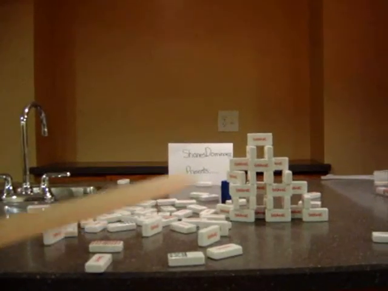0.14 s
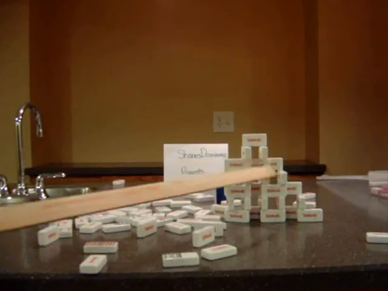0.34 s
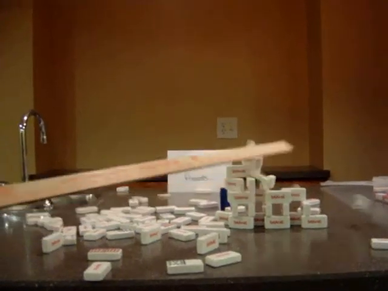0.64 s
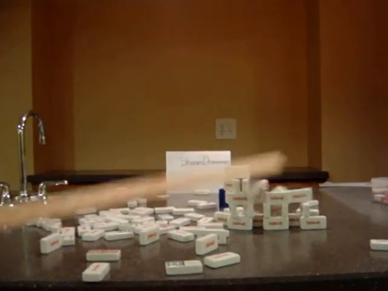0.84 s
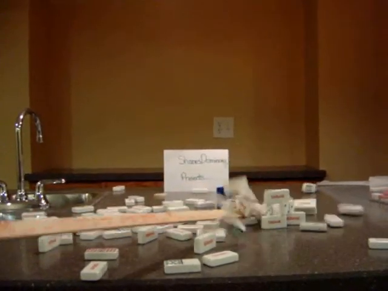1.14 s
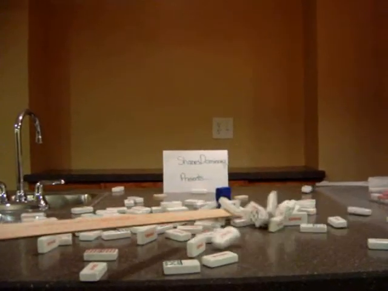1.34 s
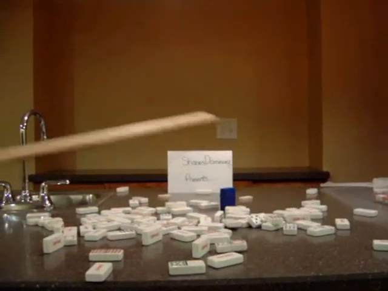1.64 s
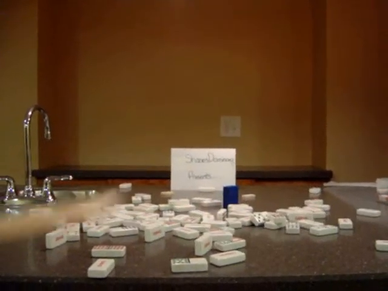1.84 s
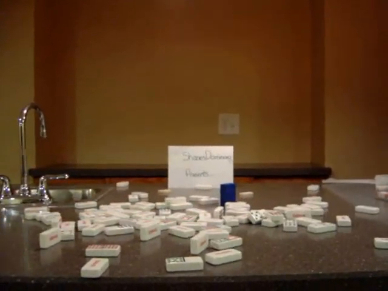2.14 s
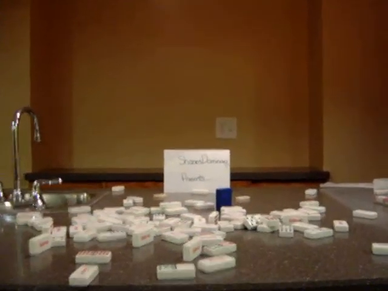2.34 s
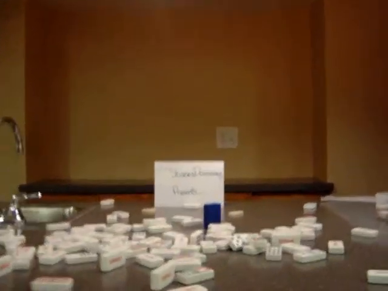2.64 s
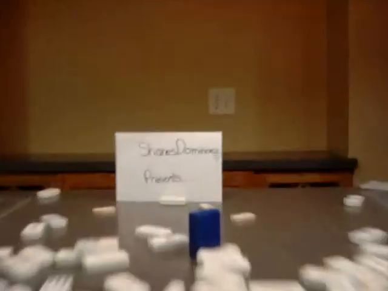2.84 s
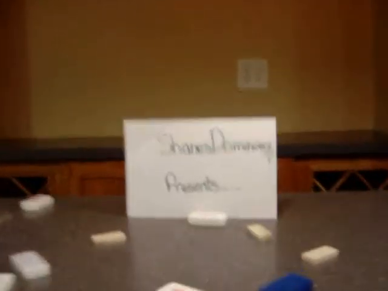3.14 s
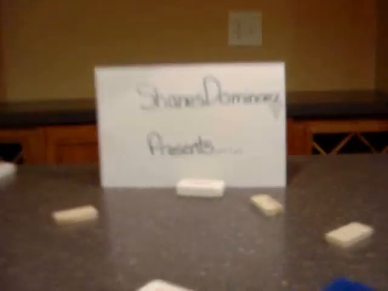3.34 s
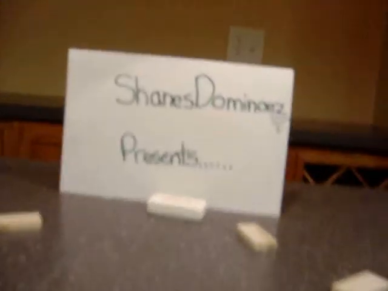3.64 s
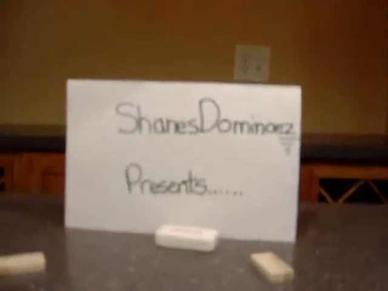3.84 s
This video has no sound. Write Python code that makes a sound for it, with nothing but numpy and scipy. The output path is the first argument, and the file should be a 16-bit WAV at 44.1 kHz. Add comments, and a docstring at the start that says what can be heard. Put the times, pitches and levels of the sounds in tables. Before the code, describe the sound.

Hard domino tiles clack sharply from the start in separate bursts, then from about 0.7 s tumble densely onto a kitchen counter, loud and slightly distorted, thinning out by 2 s with a short room echo. Faint hiss, low murmur and wavering appliance hum remain. A handling tick comes near 2.55 s, a quick double wooden stick knock at 2.8 s, then ticks and soft rubs around 3, 3.5 and 3.8 s.

```python
"""A kitchen counter, where a stick topples towers of small hard tiles: they clack together and land dully.
Clacks are short noise bursts with ringing tile modes; landings are duller bursts with a boom of the counter.
Loud single hits lie over a dense random tumble. Hiss, a murmur and a wavering appliance hum stay on.
Then come ticks and rubs from handling the camera, made of noise through resonances,
and two knocks of the stick being laid down, with its wood modes ringing."""
import sys
import numpy as np
from scipy import signal
from scipy.fft import rfft, irfft
from scipy.io import wavfile
from scipy.ndimage import uniform_filter1d

SR = 44100
rng = np.random.default_rng(int(sys.argv[2]) if len(sys.argv) > 2 else 0)


def store_wav(level_fs):
    """Save 16-bit WAV to argv[1]."""
    pcm = np.round(np.clip(np.atleast_2d(level_fs), -1, 1) * 32767)
    wavfile.write(sys.argv[1], SR, pcm.T.astype(np.int16))


N = 176400


def amp(db):
    """Turn decibels into a plain gain."""
    return 10 ** (np.asarray(db) / 20)


def evened(x):
    """Scale a sound to an RMS level of one."""
    return x / np.sqrt(np.mean(x ** 2) + 1e-20)


def read(points, hz):
    """Read a table of values against pitch, along a logarithmic pitch scale."""
    f, value = np.transpose(points)
    return np.interp(np.log(hz + 1), np.log(f + 1), value)


def curve(table, col):
    """Draw one column of a table as straight lines over the whole scene."""
    table = np.asarray(table)
    return np.interp(np.arange(N) / SR, table[:, 0], table[:, col])


def add(mix, start_s, sound):
    """Lay a sound into the mix from its start time, cut off at the end."""
    part = mix[round(start_s * SR):][:len(sound)]
    part += sound[:len(part)]


def colour(x, tone):
    """Filter with the given spectrum, responding as early as possible (minimum phase)."""
    hz = abs(np.fft.fftfreq(8192, 1 / SR))
    log_gain = np.log(amp(np.maximum(read(tone, hz), -100)))
    taps = np.fft.ifft(np.exp(np.conj(signal.hilbert(log_gain)))).real[:4096]
    return signal.oaconvolve(x, taps)[:len(x)]


def band(x, hz, width):
    """One resonance that lets a band of the given width through."""
    return signal.lfilter(*signal.iirpeak(hz, max(hz / width, .3), SR), x)


SNAP = 2.6  # size of the first click against the noise after it
CHATTER_S, CHATTER_DB = .014, -2  # longest delay of the quick bounces, and their greatest level


def contact(t60, tone, bounce_s=0.):
    """One impact: a snap and a dying puff of noise, perhaps with quick bounces; evenly broad, then coloured."""
    t = np.arange(4410) / SR
    first = t == 0
    puff = rng.standard_normal(len(t)) * amp(-60 * t / t60) + SNAP * first
    bounces = .7 * first
    if bounce_s > 0:
        when, size = rng.random((2, 9))
        at = 1 + (bounce_s * when * SR).astype(int)
        bounces[at] = amp(CHATTER_DB) * np.cos(2 * np.pi * size)
    spectrum = rfft(puff) * rfft(bounces)
    # level the spectrum so that only the tone table colours it
    smooth_power = uniform_filter1d(abs(spectrum) ** 2, size=12)
    flat = irfft(spectrum / np.sqrt(smooth_power + 1e-9))
    flat = flat * amp(-12 * t / (t60 + bounce_s))
    x = colour(flat, tone)
    return 3 * x / np.linalg.norm(x)


# The colour of two tiles touching. Each row: pitch in Hz, level in dB.
CLACK_TONE = [(880, -21.5), (1500, -7), (2360, -27), (3950, -4.5), (5260, -4), (7800, -4.5), (9790, -10.5),
              (10800, -21), (11800, -11.5), (15900, -16)]
# The ways a tile rings. Each row: pitch in Hz, level in dB, time to fade by 60 dB in seconds.
TILE = [(7669, -4, 0.028), (12530, -25.5, 0.016), (6200, -12, .015), (8200, -11.5, 0.023),
        (15320, -20, 0.012)]
CLACK_S = 0.0033  # fade of the noise puff by 60 dB, seconds
TILE_SPREAD = .025  # random detuning, as a share of the pitch


def clack(ring_db, bounce_s=0.):
    """A sharp contact that rings the tile's modes, slightly detuned for each tile."""
    t = np.arange(4410) / SR
    x = contact(CLACK_S, CLACK_TONE, bounce_s)
    for hz, db, t60 in TILE:
        detune, loudness = rng.standard_normal(2)
        ring = amp(ring_db + db + 2 * loudness - 60 * t / t60)
        x = x + ring * np.sin(2 * np.pi * hz * (1 + TILE_SPREAD * detune) * t)
    return x


# The boom of the counter. Each row: pitch in Hz, level in dB.
BOOM_TONE = [(88, -36.5), (150, -18), (253, -1), (292, -2.5), (334, 3.5), (467, -6), (678, -8.5),
             (1000, -7), (1300, -32), (2200, -120)]
BOOM_S = 0.017  # fade of the noise puff by 60 dB, seconds


def boom():
    """A low noise burst: the counter top answering a hit."""
    return contact(BOOM_S, BOOM_TONE)


# The lowest part of the tumble. Each row: pitch in Hz, level in dB.
RUMBLE_TONE = [(15, -3.5), (30, 0), (150, 0.5), (300, -19.5), (1000, -49)]


def rumble():
    """A very low noise burst under the tumble."""
    return contact(0.038, RUMBLE_TONE)


# The colour of a tile landing on the counter. Each row: pitch in Hz, level in dB.
LAND_TONE = [(290, -35), (500, -17), (700, -11), (1100, -7.5), (1500, -4.5), (2000, 0.5), (2600, -0.5),
             (3500, -3), (6900, -12.5), (9000, -13.5), (11700, -46), (19800, -100)]
LAND_S = 0.019  # fade of the noise puff by 60 dB, seconds
DULL_HZ = 5000  # the single landings lose treble above this


def landing(boom_db, tilt_db):
    """A dulled bouncing contact, tilted in colour around 2000 Hz, with the boom of the counter."""
    tone = [(hz, level + tilt_db * np.log2(hz / 2000)) for hz, level in LAND_TONE]
    b, a = signal.butter(N=2, Wn=DULL_HZ, fs=SR)
    tap = signal.lfilter(b, a, contact(LAND_S, tone, CHATTER_S))
    return tap + amp(boom_db + 8) * boom()


SIZE_DB = 2  # how unevenly loud the random hits are


def scatter(make, per_s, level_db, count):
    """Random impacts of uneven size that follow a level; they stop where the tumble ends."""
    size = amp(SIZE_DB * np.minimum(rng.exponential(1, N), 4))
    size = size * (rng.random(N) < per_s / SR) * rng.choice([-1, 1], N)
    which = rng.integers(0, count, N)
    shapes = [make() for _ in range(count)]
    shape_energy = np.mean([np.sum(s ** 2) for s in shapes])
    scale = np.sqrt(np.mean(size ** 2) * shape_energy)
    falling = np.arange(N) < TUMBLE[-1][0] * SR
    size = size * amp(level_db) * falling / scale
    return sum(signal.oaconvolve(size * (which == k), s)[:N] for k, s in enumerate(shapes))


# The rest of the tumble, before each layer's trim.
# Each row: time in seconds, then the levels in dB of the landings, clacks, boom and rumble.
TUMBLE = [(0.0, -20.5, -13, -36, -50.5), (0.042, -23.5, -19.5, -40, -38.5), (0.244, -39.5, -28, -64, -64),
          (0.26, -18.5, -33.5, -36, -55), (0.29, -21, -22.5, -42.5, -47), (0.366, -37.5, -34.5, -49.5, -57),
          (0.382, -23, -29, -39.5, -36.5), (0.464, -38, -34, -56, -45), (0.474, -22, -34, -46.5, -48),
          (0.538, -23.5, -27, -48, -47), (0.562, -30, -29, -46.5, -39.5), (0.656, -22, -23.5, -43.5, -59),
          (0.672, -27, -24, -35, -51), (0.682, -7.5, -21, -27, -60), (0.742, -15.5, -21.5, -27, -52.5),
          (0.798, -19, -23, -34.5, -46), (0.828, -24.5, -22.5, -31.5, -61.5), (0.84, -8, -26, -29, -54),
          (0.872, -4, -20.5, -23, -51), (0.906, -13.5, -14, -37.5, -55.5), (0.922, -7, -17, -28.5, -50.5),
          (0.97, -14, -15, -27, -46), (1.08, -10.5, -16, -25.5, -53), (1.236, -10, -14.5, -28.5, -52.5),
          (1.244, -10, -11.5, -30.5, -34), (1.44, -10, -10, -25.5, -47), (1.468, -9.5, -15.5, -34, -47),
          (1.5, -14, -17, -29, -38), (1.54, -14, -12.5, -28, -50), (1.598, -13.5, -14, -31.5, -57),
          (1.664, -17.5, -17, -30.5, -42), (1.686, -16, -14, -31.5, -64.5), (1.776, -23.5, -29, -34, -45),
          (1.8, -25, -21, -32, -52), (1.84, -25, -25.5, -41, -51.5), (1.938, -29, -24.5, -43, -69),
          (2.0, -48, -53, -51, -75)]
CLACKS_PER_S, LANDINGS_PER_S = 500, 500


def tumble():
    """Four crowds of random impacts that merge into one dense clatter."""
    out = scatter(lambda: clack(-10.5), CLACKS_PER_S, curve(TUMBLE, 2) - 6, count=40)
    out = out + scatter(lambda: contact(LAND_S, LAND_TONE), LANDINGS_PER_S, curve(TUMBLE, 1) - 6, count=40)
    out = out + scatter(boom, 150, curve(TUMBLE, 3) - 5, count=20)
    return out + scatter(rumble, 110, curve(TUMBLE, 4) - 3, count=12)


# Tiles striking each other.
# Each row: start in seconds, level in dB, ring of the tile in dB against the clack.
CLACKS = [(0.0044, 3.5, -6.5), (0.0104, -5.5, -8), (0.016, -17.5, -5), (0.0254, -3, -6.5), (0.038, -4, -8),
          (0.0659, 1, -7), (0.0695, 5.5, -8.5), (0.0759, 0, -8), (0.0917, -1, -2.5), (0.0986, -3, -2),
          (0.2818, -5.5, -9), (0.2836, -0.5, -10.5), (0.3014, -9, -8.5), (0.3784, -4.5, -7),
          (0.3884, 1.5, -5.5), (0.3956, -5.5, -7.5), (0.4231, -0.5, -5.5), (0.433, -8, -6.5),
          (0.4934, -2.5, -4), (0.5086, -13.5, -6.5), (0.566, 2.5, -5.5), (0.5701, -8, -8.5),
          (0.587, -9, -8.5), (0.7795, -9, -14), (0.8, -2.5, -9), (0.923, -3, -7), (0.968, 3.5, -9.5),
          (0.9886, -2.5, -6), (1.1536, -2.5, -7.5), (1.222, 5.5, -9.5), (1.2814, -0.5, -11.5),
          (1.3996, -3, -14), (1.4911, 6.5, -4), (1.528, -2.5, -6), (1.5793, -0.5, -7), (1.6352, 1, -5),
          (1.6986, -3.5, -13.5), (1.7359, 0.5, -6.5), (1.751, -10, -10.5), (1.7902, 0, -9),
          (1.8555, -5, -4), (1.939, -13.5, -6.5)]
# Tiles landing on the counter. Each row: start in seconds, level in dB,
# boom of the counter in dB (raised later by a fixed step), tilt of the colour in dB per octave.
LANDINGS = [(0.0345, 7, -33.5, -0.5), (0.0481, -5, -31, -0.5), (0.0644, -19.5, -24, -3),
            (0.2567, -1, -32.5, -6), (0.2706, -9.5, -37.5, -3), (0.2862, -7, -30.5, -2.5),
            (0.3137, -14, -29, 6.5), (0.3765, 0, -33.5, 0), (0.3841, -2, -41, -1.5),
            (0.4757, -2.5, -28.5, -7.5), (0.5096, -0.5, -42, -1), (0.598, -11.5, -17, -1.5),
            (0.626, -5, -31, -3), (0.6795, 3, -22, -3.5), (0.6939, 0, -21, -5), (0.7195, 1.5, -17.5, -5),
            (0.7364, -11.5, -28.5, -4.5), (0.8355, -3.5, -14.5, -1), (0.915, -1, -28, 3.5),
            (0.9256, 3.5, -35, -1), (0.9695, 4, -31, -2), (0.989, -4.5, -26.5, 3), (1.0445, 0, -21, -5.5),
            (1.1091, -0.5, -22, -6), (1.1547, 1.5, -29, -1), (1.2294, -6, -21, -6.5),
            (1.3995, -4.5, -22.5, -4.5), (1.4795, -9, -23, -5), (1.5699, -7.5, -25, -8),
            (1.6394, -2, -22, 4.5), (1.6995, 0.5, -25, 2), (1.7897, -10, -28, -2)]


def tiles():
    """The loudest impacts, one by one, over the dense tumble."""
    out = tumble()
    for start_s, db, ring_db in CLACKS:
        add(out, start_s, amp(db) * clack(ring_db, CHATTER_S))
    for start_s, db, boom_db, tilt_db in LANDINGS:
        add(out, start_s, amp(db) * landing(boom_db, tilt_db))
    return out


# How long the room rings. Each row: pitch in Hz, time to fade by 60 dB in seconds.
ROOM = [(200, 0.52), (700, 0.43), (2000, 0.52), (5000, 0.49), (9000, 0.42), (15000, 0.35)]


def room(x):
    """Sparse echoes of random sign, each band dying at its own speed; three tails take turns."""
    out = np.zeros(N)
    turn = np.arange(N) / SR * 40
    for k in range(3):
        taps = np.zeros(SR)
        at = np.arange(200, SR - 20, 20)
        taps[at + rng.integers(0, 20, len(at))] = rng.choice([-1., 1.], len(at))
        hz, t, z = signal.stft(taps, SR, nperseg=256)
        fade = amp(-60 * t / read(ROOM, hz)[:, None])
        tail = signal.istft(z * fade, SR, nperseg=256)[1]
        share = np.cos(turn + k * np.pi / 3)
        out += signal.fftconvolve(x * share, tail / np.linalg.norm(tail))[:N]
    return out * np.sqrt(2 / 3)  # the squared shares add up to 3/2


# The colour of the hiss. Each row: pitch in Hz, level in dB.
AIR = [(410, -43.5), (700, -3.5), (1200, -3), (1800, -2), (3800, -9.5), (9400, -13), (10500, -24),
       (15900, -22)]
# Loudness of the hiss, before a small lift. Each row: time in seconds, level in dB.
AIR_LEVEL = [(2.2, -59.5), (2.826, -59), (2.956, -55), (3.166, -58), (3.502, -56.5), (3.678, -54.5),
             (4.0, -55)]


def hiss():
    """Steady coloured noise that slowly changes in level."""
    return evened(colour(rng.standard_normal(N), AIR)) * amp(curve(AIR_LEVEL, 1) + 2.0)


# The colour of the low murmur. Each row: pitch in Hz, level in dB.
MURMUR = [(15, -32), (25, 3.5), (76, -16.5), (134, -9), (181, -10.5), (637, -3), (900, -20.5), (1170, -47),
          (1980, -120)]
# Loudness of the murmur, before a small lift. Each row: time in seconds, level in dB.
LOW_AIR = [(2.2, -64), (2.696, -65.5), (2.9, -61), (3.828, -54.5), (4.0, -56.5)]


def murmur():
    """Low coloured noise that slowly changes in level."""
    return evened(colour(rng.standard_normal(N), MURMUR)) * amp(curve(LOW_AIR, 1) + 1)


# Loudness of the hum, around which it wavers.
# Each row: time in seconds, then the RMS levels in dB of partials 1, 4 and 5.
HUM = [(2.0, -76, -66.5, -70), (2.5, -81, -65.5, -64.5), (2.9, -74, -61.5, -62), (3.2, -66, -76, -53),
       (3.45, -65.5, -62, -63.5), (3.7, -68, -58, -68), (3.8, -62.5, -56, -64), (4.0, -65, -53, -62)]
HUM_HZ = 127


def hum():
    """The appliance: three partials of one low pitch, each wavering at random in level."""
    t = np.arange(N) / SR
    out = np.zeros(N)
    for col, partial in ((1, 1), (2, 4), (3, 5)):
        waver_db = 2.1 * evened(uniform_filter1d(rng.standard_normal(N), 1500))
        level = np.sqrt(2) * amp(curve(HUM, col) + waver_db)
        out += level * np.sin(2 * np.pi * partial * HUM_HZ * t)
    return out


# Ticks in the camera's shell. Each row: start in seconds, peak in dB, pitch in Hz,
# fade of the noise puff by 60 dB in seconds, overtone in dB.
TICKS = [(2.557, -21, 1630, 0.026, -18), (2.577, -38, 1990, 0.015, -19), (2.981, -24.5, 2290, 0.019, -18),
         (2.986, -18.5, 2020, 0.024, -17), (3.006, -40, 2200, 0.013, -16), (3.5, -31.5, 1930, .015, -10),
         (3.530, -31, 1990, 0.014, 1), (3.5345, -21.5, 1370, 0.02, 2.5), (3.5425, -23, 1520, 0.011, -11),
         (3.548, -28.5, 1000, .015, -13), (3.81, -25.5, 910, .02, -17.5), (3.816, -40, 1100, .015, -14)]
TICK_SNAP_DB = -30  # unfiltered puff mixed in
TICK_WIDE, TICK_OVERTONE = 0.21, 1.65  # width and overtone pitch, as multiples of the pitch


def ticks():
    """Dry clicks: a short noise puff through a resonance and its overtone."""
    out = np.zeros(N)
    t = np.arange(2205) / SR
    for start_s, db, hz, t60, over_db in TICKS:
        puff = (rng.standard_normal(len(t)) + SNAP * (t == 0)) * amp(-60 * t / t60)
        width = TICK_WIDE * hz
        tick = evened(band(puff, hz, width)) + amp(TICK_SNAP_DB) * evened(puff)
        tick = tick + amp(over_db) * evened(band(puff, TICK_OVERTONE * hz, width))
        add(out, start_s, amp(db) * tick / abs(tick).max())
    return out


# Soft rubs and faint whistles while the camera moves.
# Each row: start in seconds, length in seconds, level in dB, centre in Hz, width in Hz.
RUBS = [(3.034, 0.16, -49.5, 4170, 7600), (3.4, 0.16, -66, 1730, 600), (3.566, 0.19, -51.5, 1770, 250),
        (3.571, 0.1, -55, 3180, 1500), (3.576, 0.11, -53.5, 6200, 1500), (3.743, 0.14, -49, 1830, 152),
        (3.82, 0.22, -54.5, 1120, 120)]


def rubs():
    """Noise sent twice through one resonance, swelling and fading."""
    out = np.zeros(N)
    for start_s, length_s, db, hz, width in RUBS:
        u = np.linspace(0, 1, round(length_s * SR))
        noise = rng.standard_normal(len(u))
        rub = evened(band(band(noise, hz, width), hz, width))
        add(out, start_s, amp(db) * np.sin(np.pi * u ** 0.27) * rub)
    return out


# The colour of the stick's knock. Each row: pitch in Hz, level in dB.
STICK_TONE = [(60, -61), (150, -36), (230, -7.5), (370, -21.5), (500, -6), (750, 2), (900, -19),
              (1600, -23.5), (2600, -11.5), (4200, -26), (6100, -22), (7600, -34.5), (15900, -33)]
# The ways the stick rings. Each row: pitch in Hz, level in dB,
# time to fade by 60 dB in seconds (capped and shortened below).
STICK_MODES = [(247, -8.5, 0.52), (274, -14, 0.35), (480, -4, 0.35), (535, -6, 0.39), (600, -10, 0.68),
               (694, -15, 0.43), (734, 1, 0.34), (1930, -6, .27), (2300, -12, 0.58), (2530, -17, .35),
               (3010, -10, 0.31)]
STICK_S, STICK_DB = 2.784, -7.5  # first knock: start in seconds, level
STICK_BOUNCE_S, STICK_BOUNCE_DB = .007, 1.5  # second knock: delay in seconds, level against the first
STICK_T60 = 0.061  # fade of the noise puff by 60 dB, seconds
STICK_RING_DB, STICK_RING_SHARE = -17, 0.26  # ring level against the knock, share of the fade time kept


def stick():
    """The wooden stick knocks the counter twice and rings."""
    out = np.zeros(N)
    t = np.arange(SR // 2) / SR
    ring = np.zeros(len(t))
    for hz, db, t60 in STICK_MODES:
        fade_s = STICK_RING_SHARE * min(t60, .6)
        ring += amp(db - 60 * t / fade_s) * np.sin(2 * np.pi * hz * t)
    ring *= 1 - np.exp(-t / 0.0052)  # soft onset
    for start_s, db in ((STICK_S, STICK_DB), (STICK_S + STICK_BOUNCE_S, STICK_DB + STICK_BOUNCE_DB)):
        add(out, start_s, amp(db) * contact(STICK_T60, STICK_TONE))
        add(out, start_s, amp(db + STICK_RING_DB) * ring)
    return out


WET_DB, STICK_WET_DB = -3, -1  # tiles and stick sent into the room


def scene():
    """All sources in the kitchen."""
    fall, wood = tiles(), stick()
    wet = room(amp(WET_DB) * fall + amp(STICK_WET_DB) * wood)
    quiet = hiss() + murmur() + hum()
    handling = ticks() + rubs()
    return (amp(-1) * fall + wood + wet + handling + quiet)[None]


CEILING = .84  # peaks are cut flat here
EDGE_HZ = 15950  # upper limit of the sound


def record(dry):
    """Hard overload, then the band limit."""
    clipped = np.clip(dry, -CEILING, CEILING)
    lowpass = signal.firwin(511, EDGE_HZ, window=("kaiser", 9), fs=SR)
    return signal.oaconvolve(clipped, lowpass[None], "same")


dry = scene()
out = record(dry)
store_wav(out)
```